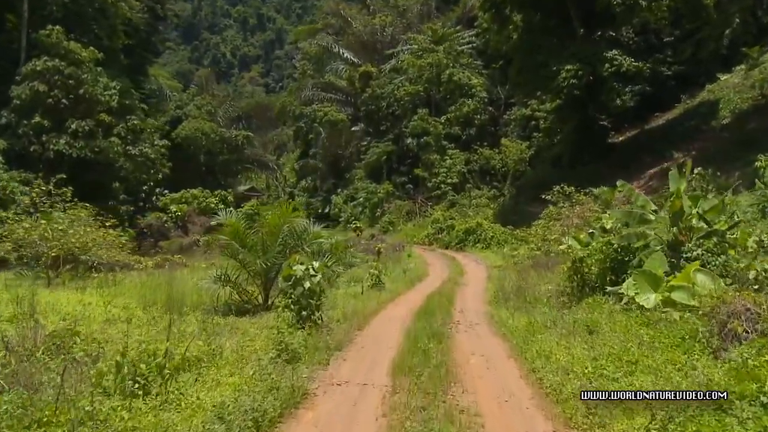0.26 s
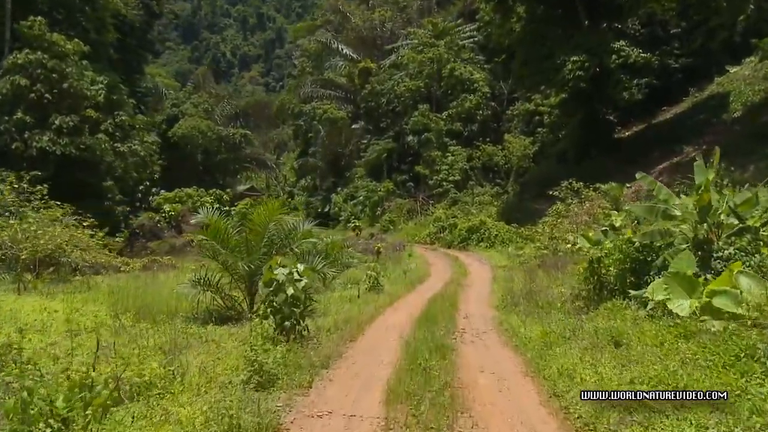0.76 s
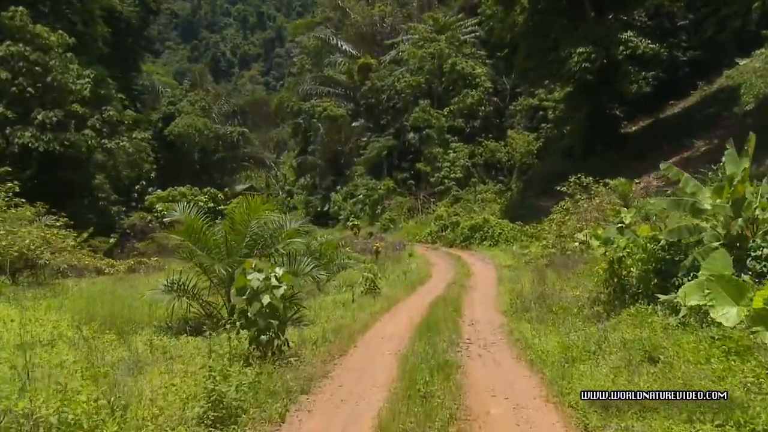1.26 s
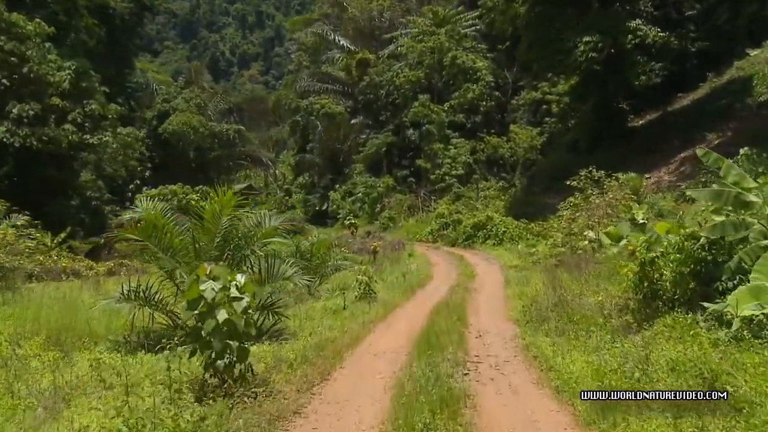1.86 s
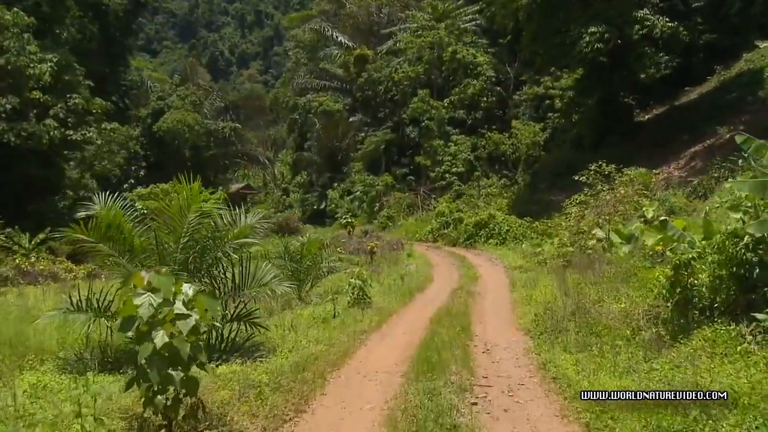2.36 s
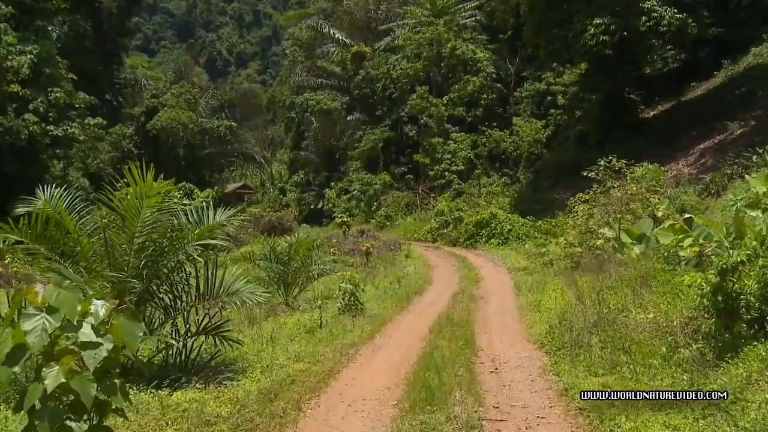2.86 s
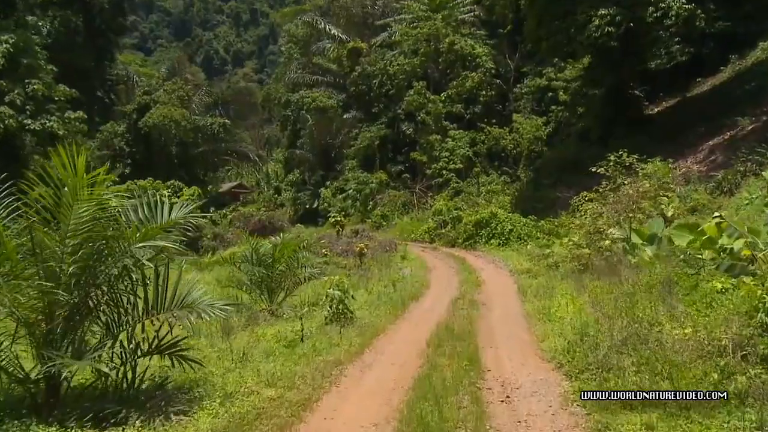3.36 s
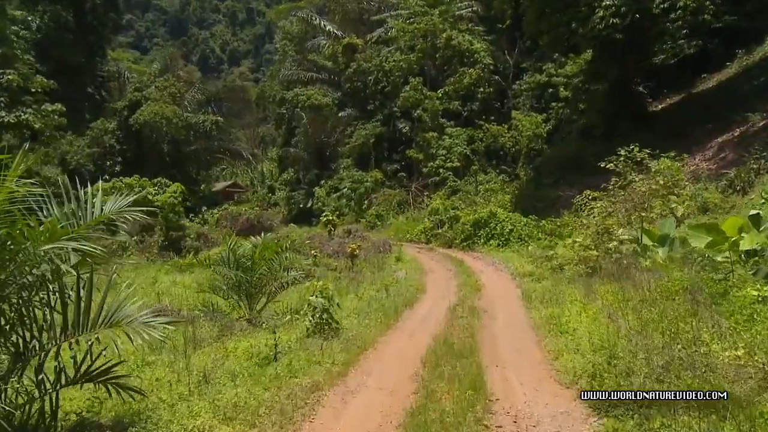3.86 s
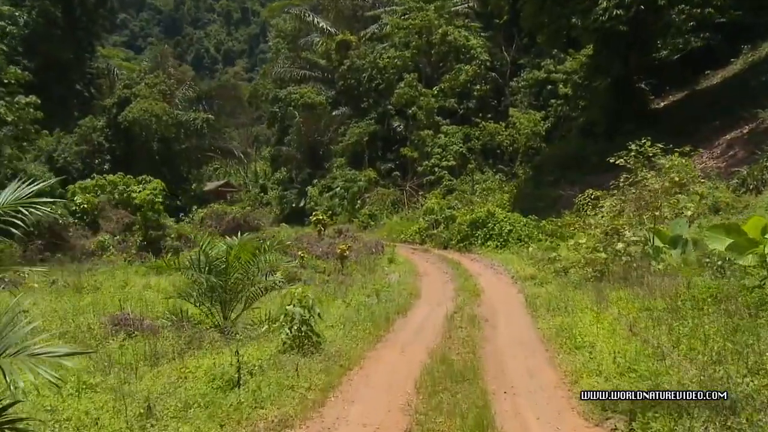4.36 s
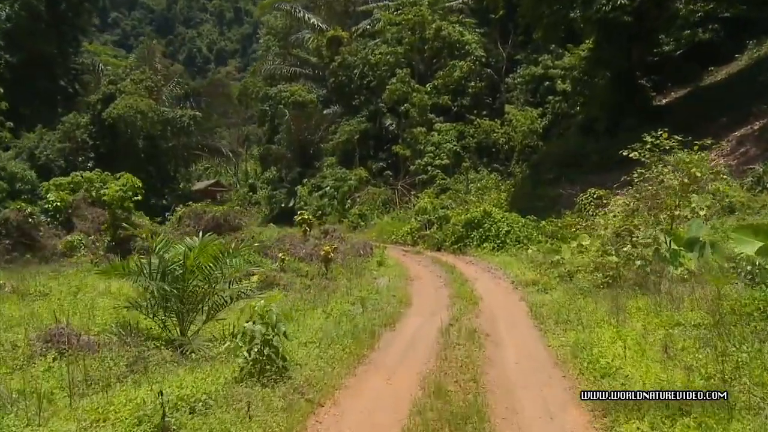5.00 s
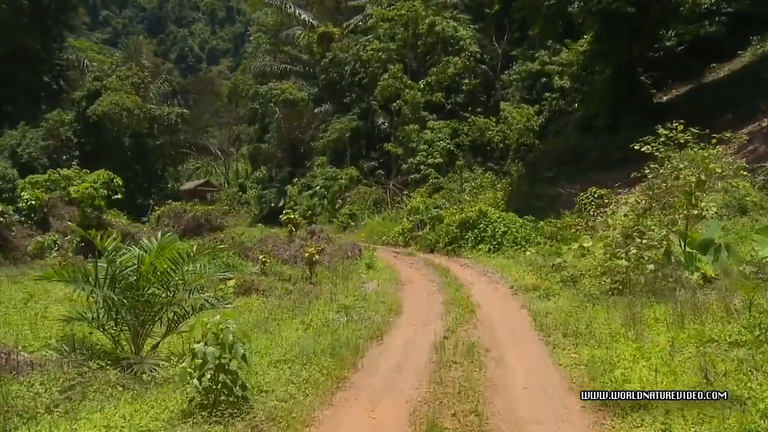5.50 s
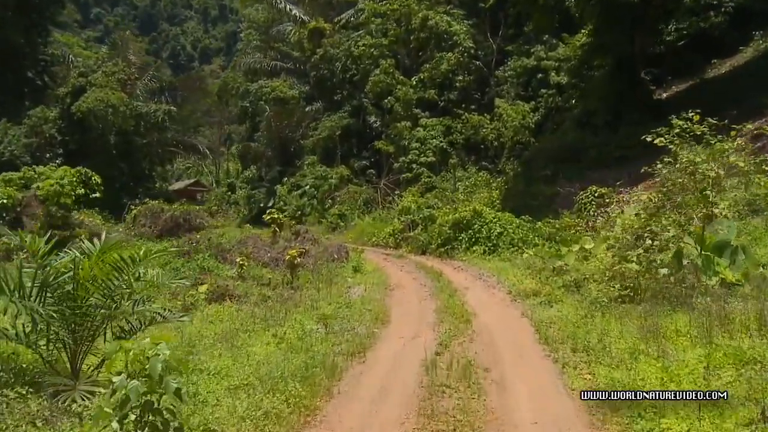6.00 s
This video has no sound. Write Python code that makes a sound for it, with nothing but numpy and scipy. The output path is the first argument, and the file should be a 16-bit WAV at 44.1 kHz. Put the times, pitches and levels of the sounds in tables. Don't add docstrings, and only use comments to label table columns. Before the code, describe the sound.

A wall of insects fills a tropical forest throughout. Two near crickets chirp in loose step, about every 0.6 seconds, while a third answers with ticking trills. Cicadas drone and swell behind them over soft leaf hiss. A tiny twig snap comes early, then a high bird whistles quick phrases with faint lower chips far off. Past the middle a shrill, very high cicada rises and stays. Open stereo microphones, short diffuse reverberation from the trees.

```python
import sys
import numpy as np
from scipy import signal
from scipy.fft import rfft, irfft, next_fast_len
from scipy.io import wavfile
from scipy.ndimage import uniform_filter1d, map_coordinates

SR = 44100
rng = np.random.default_rng(int(sys.argv[2]) if len(sys.argv) > 2 else 0)


def field_ratio(decibels):
    return 10 ** (np.asarray(decibels, dtype=float) / 20)


def store_pcm(level_fs):
    pcm = np.round(np.clip(level_fs, -1, 1) * 32767).astype(np.int16)
    wavfile.write(sys.argv[1], SR, np.atleast_2d(pcm).T)


N = 275184


def unit(x):
    return x / np.sqrt(np.mean(x ** 2) + 1e-20)


def wobble(rate_hz):
    knots = rng.standard_normal(int(N * rate_hz / SR) + 4)
    return map_coordinates(knots, [np.arange(N) * rate_hz / SR])


def add(track, s, sound):
    piece = track[max(round(s * SR), 0):][:len(sound)]
    piece += sound[:len(piece)]


def glide(knots_s, knots_hz, rough_hz):
    t = np.arange(round(knots_s[-1] * SR)) / SR
    drift_hz = rough_hz * np.interp(t, np.linspace(0, t[-1], 12), rng.standard_normal(12))
    tone_hz = np.interp(t, knots_s, knots_hz) + drift_hz
    return t, rng.uniform(0, 2 * np.pi) + 2 * np.pi * np.cumsum(tone_hz) / SR


def forest(x, pan_db, wet_db, t60_s, left_lag=0):
    t = np.arange(SR // 2) / SR
    tail = rng.standard_normal((2, len(t))) * field_ratio(-60 * t / t60_s) * (1 - np.exp(-t / .004))
    wet = signal.fftconvolve(x[None], tail / np.linalg.norm(tail[0]), axes=1)[:, :N]
    direct = np.array([np.roll(x, left_lag), x])
    pan = field_ratio(np.array([[pan_db], [-pan_db]]) / 2)
    return (direct + field_ratio(wet_db) * wet) * pan / np.sqrt(1 + field_ratio(2 * wet_db))


def chorus(rows, colour, alike, pan_db, buzz_hz, buzz_db, patchy_db):
    hz, t, z = signal.stft(rng.standard_normal((3, N)), SR, nperseg=512)
    s, level_db, centre_hz = np.transpose(rows)
    offset_hz = hz[:, None] - np.interp(t, s, centre_hz)
    colour_db = np.interp(offset_hz, *np.transpose(colour), left=-120, right=-120)
    patches = unit(uniform_filter1d(uniform_filter1d(rng.standard_normal(z.shape), 3, 1), 8, 2))
    z = z * field_ratio(colour_db + patchy_db * patches)
    mixed = np.sqrt(alike) * z[0] + np.sqrt(1 - alike) * z[1:]
    pair = unit(signal.istft(mixed, SR, nperseg=512)[1][:, :N])
    buzz_phase = 2 * np.pi * np.cumsum(buzz_hz * (1 + 0.054 * wobble(8))) / SR
    buzzing = unit(pair * field_ratio(buzz_db * np.sin(buzz_phase)))
    return buzzing * field_ratio(np.interp(np.arange(N) / SR, s, level_db) + np.array([[pan_db], [-pan_db]]) / 2)


def stroke(top_hz, end_hz, length_s, tail_db, mirror_hz, mirror_db):
    knots_s = [0, 0.14 * length_s, 0.68 * length_s, length_s]
    t, phase = glide(knots_s, [top_hz - 50, top_hz, top_hz - 15, end_hz], rough_hz=8)
    swell = np.interp(t / length_s, [0, .1, .3, .6, .9, 1], [0, .7, 1, field_ratio(tail_db), field_ratio(tail_db - 6), 0])
    cell = np.sin(2 * np.pi * rng.normal(mirror_hz, 18.3) * t + rng.uniform(0, 2 * np.pi))
    cell = cell * np.sin(np.pi * t / length_s)
    return np.sqrt(2) * (swell * np.sin(phase) + field_ratio(mirror_db) * cell)


def strokes(chirps, period_s):
    out = []
    for first, last, db in chirps:
        count = round((last - first) / period_s) + 1
        out += [(s, db) for s in np.linspace(first, last, count)]
    return out


# opening stroke in s, run from in s, run to in s, level in dB.
CENTRE_CHIRPS = [(-.08, .038, .183, -23.5), (0.563, .682, .823, -24.5), (1.2, 1.324, 1.463, -23.5),
                 (1.831, 1.956, 2.092, -23), (2.457, 2.579, 2.718, -24), (3.093, 3.206, 3.348, -24),
                 (3.766, 3.885, 4.018, -25), (4.432, 4.548, 4.688, -24.5), (5.069, 5.188, 5.331, -23),
                 (5.674, 5.791, 5.977, -23)]


def centre_strokes():
    opening_gap_s, crest_db, scatter_db = .053, 2, 0.1
    out = []
    for opening, first, last, db in CENTRE_CHIRPS:
        run = strokes([(first, last, db)], period_s=.0465)
        out += [(opening, db), (opening + opening_gap_s, db)]
        for k, (s, _) in enumerate(run):
            crest = np.sin(np.pi * (k + 0.93) / (len(run) + 1)) - .65
            out.append((s, db + crest_db * crest))
    return [(s, db + rng.normal(0, scatter_db)) for s, db in out if s > .013]


def centre_cricket():
    song = np.zeros(N)
    for s, db in centre_strokes():
        closure = stroke(5350, 4920, length_s=.044, tail_db=-4, mirror_hz=5135, mirror_db=-12)
        add(song, s - .013, field_ratio(db + 1.2) * closure)
    return forest(song, pan_db=2.8, wet_db=-11, t60_s=.12, left_lag=2)


# first stroke in s, last stroke in s, level in dB.
LEFT_CHIRPS = [(.186, .462, -30.5), (.69, .972, -30.5), (1.288, 1.566, -30), (1.895, 2.174, -31),
               (2.49, 2.768, -29.5), (3.1, 3.381, -28), (3.75, 4.032, -29.5), (4.405, 4.685, -29),
               (5.007, 5.329, -31), (5.68, 5.96, -32.5)]


def left_cricket():
    song = np.zeros(N)
    for s, db in strokes(LEFT_CHIRPS, period_s=.0465):
        closure = stroke(5275, 5047, length_s=0.0344, tail_db=-6.5, mirror_hz=5080, mirror_db=-19)
        add(song, s - .012, field_ratio(db + 2.5 + rng.normal(0, 1.2)) * closure)
    return forest(song, pan_db=8, wet_db=-9, t60_s=.12)


# first pair in s, last pair in s, level in dB.
TICK_TRILLS = [
    (.452, .974, -31.5),
    (1.746, 2.135, -30.5),
    (2.923, 3.316, -31),
    (4.216, 4.56, -31),
    (5.08, 5.34, -46),
]


def ticking_cricket():
    song = np.zeros(N)
    for s, db in strokes(TICK_TRILLS, period_s=.0434):
        for lag_s, gain_db, top_hz in [(-.012, -7.5, 4843), (.001, -3.5, 4884)]:
            t, phase = glide([0, .004, .011], [top_hz, top_hz - 60, top_hz - 380], rough_hz=12)
            tick = np.sin(np.pi * t / t[-1]) * np.sin(phase)
            add(song, s + lag_s, field_ratio(db + gain_db + rng.normal(0, 1.2)) * tick)
    return forest(song, pan_db=-7, wet_db=-3, t60_s=.1)


def low_cricket():
    level_db = -58 + 3 + .6 * wobble(3) + 4.5 * wobble(16)
    tone = np.sin(2 * np.pi * np.cumsum(3847 + 10 * wobble(50)) / SR)
    return forest(field_ratio(level_db) * tone, pan_db=-1, wet_db=0, t60_s=.15, left_lag=3)


# time in s, level in dB.
FAR_CRICKETS = [(0, -32), (1.1, -35), (2.3, -32.5), (3.5, -33), (4.2, -34), (4.9, -35), (6.24, -37.5)]
# offset from centre in Hz, gain in dB.
FAR_WING = [(-900, -23), (-450, -12.5), (-200, -4), (20, 0.5), (118, 1), (234, -30)]


def far_crickets():
    rows = [(s, db, 5330) for s, db in FAR_CRICKETS]
    return chorus(rows, FAR_WING, alike=0.079, pan_db=1.0, buzz_hz=21.6, buzz_db=0.5, patchy_db=3.0)


def crickets():
    return centre_cricket() + left_cricket() + ticking_cricket() + low_cricket() + far_crickets()


# start in s, loudest in s, end in s, peak in dB.
SWELLS = [
    (-.6, -.2, 0.04, -34.5),
    (0.245, 0.494, 1.15, -34.5),
    (1.523, 1.77, 2.06, -32),
    (2.166, 3, 3.57, -32.5),
    (3.584, 3.998, 5.34, -32),
    (5.404, 5.755, 7, -32.5),
]


def swells():
    attack_s, release_s, onset_db, fade_db, rest_db = 0.086, 0.35, -4.5, -10, -56.5
    s = np.arange(0, N / SR, .01)
    phrases = []
    for start, loudest, end, db in SWELLS:
        knots_s = [start, start + attack_s, loudest, end, end + release_s]
        phrases.append(np.interp(s, knots_s, [rest_db, db + onset_db, db, db + fade_db, rest_db]))
    level_db = np.max(phrases, axis=0)
    drum_hz = 6950 + 17 * np.maximum(level_db + 34, -12)
    return np.transpose([s, level_db, drum_hz])


# offset from centre in Hz, gain in dB.
SWELL_DRUM = [(-1200, -15.5), (-700, -10.5), (-150, -5.5), (97, -0.5), (495, -21), (1150, -22), (1500, -41)]


def swelling_cicadas():
    return chorus(swells(), SWELL_DRUM, alike=0.097, pan_db=0.0, buzz_hz=134, buzz_db=1.0, patchy_db=3.5)


# time in s, level in dB.
DRONE = [(0, -34.5), (.54, -32.5), (1.09, -38), (1.3, -28), (1.77, -35), (2.24, -35.5), (2.48, -29.5),
         (2.94, -34), (3.44, -31.5), (4.38, -33), (5.75, -35), (6.24, -31)]
# offset from centre in Hz, gain in dB.
DRONE_DRUM = [(-700, -28), (-350, -7), (-100, -3.5), (197, -4), (444, -10), (750, -26.5)]


def droning_cicadas():
    rows = [(s, db, 7600 - 22 * (db + 34)) for s, db in DRONE]
    return chorus(rows, DRONE_DRUM, alike=0.032, pan_db=0.5, buzz_hz=66, buzz_db=0.3, patchy_db=3.5)


# time in s, level in dB, wing resonance in Hz.
KATYDID = [(0.0, -42.5, 9260), (0.55, -41.5, 9400), (1.6, -40.5, 9130), (1.75, -40, 9120),
           (2.28, -42, 9390), (3.53, -41, 9340), (4.57, -39.5, 8570), (4.8, -40, 9130), (5.3, -42.5, 9400),
           (6.24, -40, 9170)]
# offset from centre in Hz, gain in dB.
KATYDID_WING = [(-620, -6.5), (-300, -5), (0, 0.5), (400, -2.5), (792, -11), (1500, -3), (2296, -16.5),
                (3200, -23)]


def katydids():
    return chorus(KATYDID, KATYDID_WING, alike=0.058, pan_db=-0.5, buzz_hz=83.4, buzz_db=0.5, patchy_db=4.5)


# time in s, level in dB, drum resonance in Hz.
SHRILL = [(0.0, -42, 12260), (0.99, -46.5, 11950), (1.53, -54, 12400), (2.33, -61.5, 12900),
          (2.75, -58.5, 13100), (2.94, -61, 12400), (3.56, -57, 12600), (3.65, -43, 12400),
          (3.93, -34.5, 13100), (4.01, -36.5, 12850), (4.68, -36.5, 12300), (5.18, -39, 12040),
          (5.49, -39.5, 12650), (5.86, -34.5, 13170), (6.24, -36, 12900)]
# offset from centre in Hz, gain in dB.
SHRILL_DRUM = [(-3500, -11), (-2000, -13), (-800, -2.5), (2, -0.5), (696, -1.5), (1198, -4), (1600, -54)]


def shrill_cicadas():
    return chorus(SHRILL, SHRILL_DRUM, alike=0.075, pan_db=-1.0, buzz_hz=330, buzz_db=-0.5, patchy_db=1.0)


def cicadas():
    return swelling_cicadas() + droning_cicadas() + katydids() + shrill_cicadas()


def slurred(notes, rise, fall):
    out = []
    for start, end, first_hz, last_hz, db in notes:
        share = rise if last_hz > first_hz else fall
        out.append((start, end, first_hz, first_hz + share * (last_hz - first_hz), last_hz, db))
    return out


def whistle(notes, octave_db, rough_hz):
    song = np.zeros(N)
    for start, end, first_hz, slur_hz, last_hz, db in notes:
        t, phase = glide([0, 0.43 * (end - start), end - start], [first_hz, slur_hz, last_hz], rough_hz)
        swell = np.abs(np.sin(np.pi * (t / t[-1]) ** 0.77)) ** 0.75
        add(song, start, field_ratio(db + 4.0) * swell * (np.sin(phase) + field_ratio(octave_db) * np.sin(2 * phase)))
    return song


# start in s, end in s, first pitch in Hz, last pitch in Hz, level in dB.
WARBLER = [(1.042, 1.1, 5930, 7200, -23.5), (1.12, 1.19, 7200, 6950, -25), (1.215, 1.29, 7900, 7150, -23),
           (1.32, 1.4, 7980, 7350, -31), (1.43, 1.48, 7950, 7600, -28.5), (1.525, 1.6, 8400, 7720, -29),
           (1.615, 1.69, 8670, 8450, -30), (1.72, 1.78, 9250, 9050, -37), (2.975, 3.02, 5680, 6400, -26.5),
           (3, 3.04, 7650, 7600, -27), (3.06, 3.12, 7710, 7400, -26.5), (3.155, 3.2, 7970, 8100, -33.5),
           (3.175, 3.25, 7650, 7500, -26.5), (3.29, 3.36, 7850, 7350, -32), (3.4, 3.5, 7710, 7550, -28.5),
           (3.5, 3.58, 9550, 9400, -43), (4.225, 4.3, 5960, 7750, -26), (4.335, 4.41, 7840, 7750, -29),
           (4.43, 4.5, 8150, 7850, -31.5), (4.62, 4.77, 10280, 10150, -44.5), (6.2, 6.25, 5770, 6440, -28),
           (6.222, 6.26, 7100, 7200, -27)]
# time in s, level in dB, centre in Hz.
RASP = [
    (2.96, -60, 9000),
    (2.99, -36, 9000),
    (3.01, -31.5, 8950),
    (3.04, -56, 9000),
]
# offset from centre in Hz, gain in dB.
RASP_COLOUR = [(-3600, -10), (-3000, -8), (-1000, -2), (1500, -4), (3500, 0), (6000, -16)]


def warbler():
    song = whistle(slurred(WARBLER, rise=.88, fall=.85), octave_db=-21, rough_hz=69)
    rasp = chorus(RASP, RASP_COLOUR, alike=0.29, pan_db=-1.0, buzz_hz=150, buzz_db=5, patchy_db=-3.0)
    near_rasp = abs(np.arange(N) / SR - 3) < .05
    return forest(song, pan_db=-0.3, wet_db=2, t60_s=.3) + rasp * near_rasp


# start in s, end in s, first pitch in Hz, last pitch in Hz, level in dB.
BULBUL = [(.6, 1, 2570, 2574, -58), (1.055, 1.115, 1656, 1500, -48.5), (1.255, 1.305, 1463, 1540, -47.5),
          (1.33, 1.36, 2510, 2630, -47), (1.54, 1.565, 1820, 1570, -47), (1.57, 1.595, 1930, 2140, -50),
          (1.71, 1.74, 1800, 1560, -44.5), (1.735, 1.775, 1590, 1874, -47.5), (1.8, 2, 2250, 2343, -58),
          (6.14, 6.2, 2330, 2220, -50)]
# time in s, peak in dB, pitch in Hz.
CHIPS = [(.0677, -47, 1580), (.1294, -43, 1590), (.6683, -42, 1565), (.817, -39, 2310), (.8776, -43, 1795),
         (1.263, -39, 1535), (1.4192, -38, 2470), (1.4894, -42, 1690), (2.0203, -38, 2320),
         (2.4578, -41, 2240), (2.5077, -47, 2110), (2.6085, -44, 2300), (2.6648, -43, 1990),
         (2.6954, -46, 1660), (3.051, -41, 2020), (3.1966, -43, 2300), (3.255, -45, 1980),
         (3.7094, -44, 1590), (4.2794, -46, 1526), (4.4308, -41.5, 2305), (4.9194, -44, 1550),
         (4.9701, -43, 2200), (5.5847, -45, 2080)]
# time in s, peak in dB.
DOUBLE_CHIPS = [(0.7143, -43), (1.3138, -41.5), (1.865, -43), (1.916, -44)]


def far_birds():
    break_s, high_hz, low_hz = 0.02, 2280, 1590
    calls = list(CHIPS)
    for s, db in DOUBLE_CHIPS:
        calls += [(s, db, high_hz), (s + break_s, db, low_hz)]
    chips = [(s, s + .022, 1.13 * hz, 1.02 * hz, .88 * hz, db - 8) for s, db, hz in calls]
    song = whistle(slurred(BULBUL, rise=.45, fall=.4) + chips, octave_db=-30, rough_hz=45)
    return forest(song, pan_db=-1.5, wet_db=0, t60_s=.2)


def birds():
    return warbler() + far_birds()


# time in s, peak in dB.
TWIG = [
    (0.5271, -23),
]


def twig():
    snap, t = np.zeros(N), np.arange(SR // 100) / SR
    modes = sum(gain * np.sin(2 * np.pi * hz * t) for hz, gain in [(3300, 1), (2100, 1.2), (1250, 0.74)])
    for s, db in TWIG:
        add(snap, s, field_ratio(db + 4 - 60 * t / 0.005) * modes * (1 - np.exp(-t / 0.00025)))
    return forest(2 * np.gradient(snap), pan_db=0, wet_db=-8, t60_s=.04)


# frequency in Hz,
# density in dB per Hz.
LEAVES = [(15, -44), (45, -36), (75, -22.5), (156, -5.5), (420, -6), (1400, -10.5), (4300, -7.5),
          (6000, -7.5), (8600, -14.5), (13000, -10.5), (15700, -11.5)]


def leaves():
    hz, db = np.transpose(LEAVES)
    size = next_fast_len(N)
    colour = field_ratio(np.interp(np.log(np.fft.rfftfreq(size, 1 / SR) + 1), np.log(hz), db))
    both, left, right = irfft(rfft(rng.standard_normal((3, size))) * colour, size)[:, :N]
    level_db = -47 + 5.5 + 0.29 * wobble(3.3) + np.array([[-.25], [.25]])
    return field_ratio(level_db) * unit(0.43 * both + np.array([left, right]))


def scene():
    return crickets() + cicadas() + birds() + twig() + leaves()


# frequency in Hz, density in dB per Hz.
FAINT = [(300, -140), (1500, -90), (4200, -83.5), (5900, -83), (8600, -83.5), (9400, -88), (10200, -82),
         (11500, -86.5)]


def starve(dry, follow, scatter_db):
    hz, t, z = signal.stft(dry, SR, "cosine", nperseg=2048, scaling="psd")
    power = 2 * np.mean(np.abs(z) ** 2, axis=0) + 1e-20
    loud_db = uniform_filter1d(10 * np.log10(power.sum(axis=0)), size=5)
    shrill_db = 10 * np.log10(power[(hz > 11500) & (hz < 13000)].mean(axis=0))
    strain_db = np.maximum(uniform_filter1d(shrill_db, size=3) + 79.5, 0)
    cost = .95 * (hz > 13000) + .25 * (hz < 4600)
    follow = follow + .9 * (abs(hz - 6150) < 550)
    limit_db = np.interp(hz, *np.transpose(FAINT))[:, None] + cost[:, None] * strain_db
    limit_db = limit_db + follow[:, None] * (loud_db - np.median(loud_db))
    heard = np.ones(power.shape)
    for first, last, width, sooner_db, frames in [(4, 1024, 6, 0, 2), (264, 504, 30, 3.5, 6)]:
        power_patch = power[first:last].reshape(-1, width, len(t)).mean(axis=1)
        limit_patch_db = limit_db[first:last].reshape(-1, width, len(t)).mean(axis=1)
        luck = uniform_filter1d(rng.standard_normal(power_patch.shape), size=frames, axis=1)
        luck = unit(uniform_filter1d(luck, size=2, axis=0))
        kept = 10 * np.log10(power_patch) > limit_patch_db + sooner_db + scatter_db * luck
        heard[first:last] *= np.repeat(kept, width, axis=0)
    return signal.istft(z * heard, SR, "cosine", nperseg=2048, scaling="psd")[1][:, :N]


def band_limit(x):
    return signal.sosfilt(signal.butter(12, 15700, fs=SR, output="sos"), x)


def record(dry):
    mix = starve(dry, follow=.3, scatter_db=1.2)
    return band_limit(mix)


dry = scene()
out = record(dry)
store_pcm(out)
```